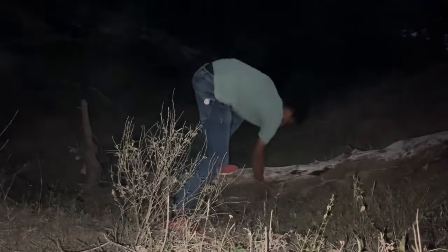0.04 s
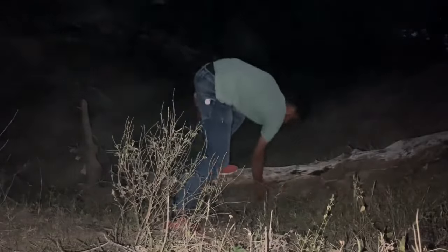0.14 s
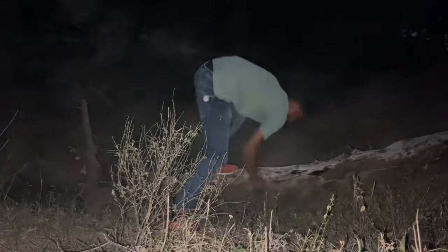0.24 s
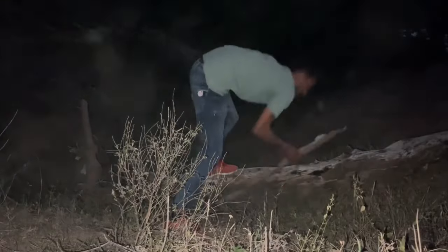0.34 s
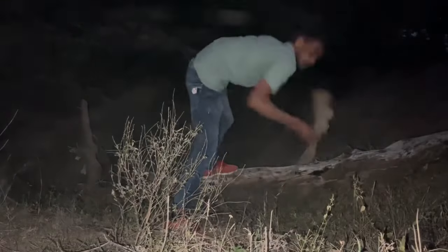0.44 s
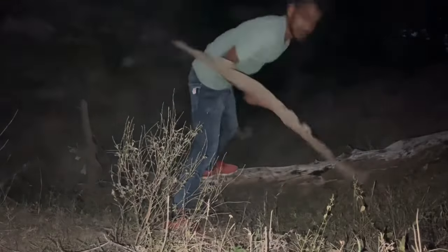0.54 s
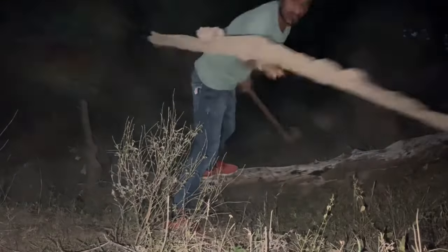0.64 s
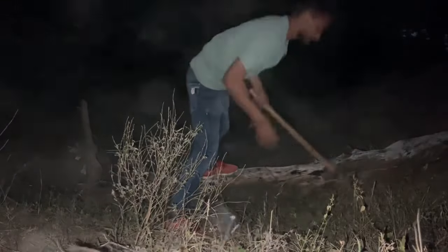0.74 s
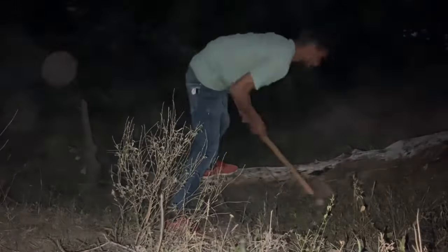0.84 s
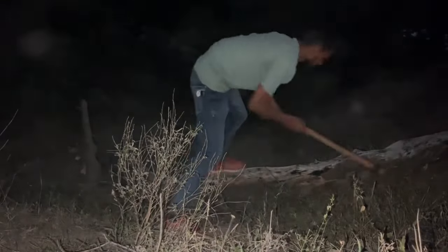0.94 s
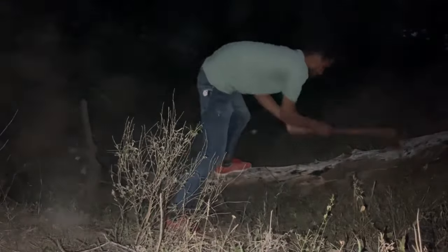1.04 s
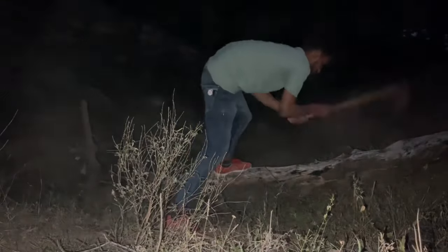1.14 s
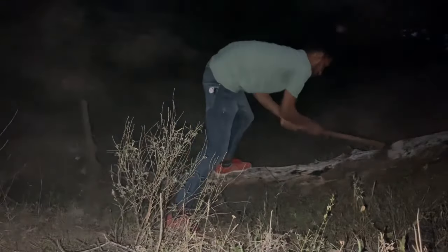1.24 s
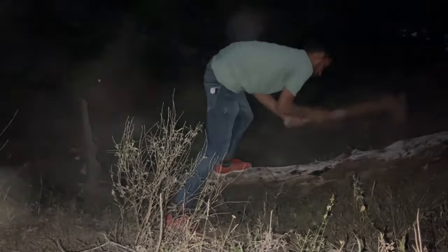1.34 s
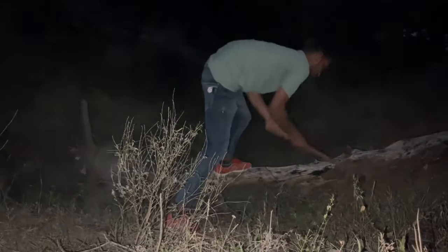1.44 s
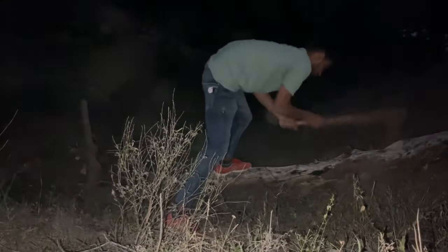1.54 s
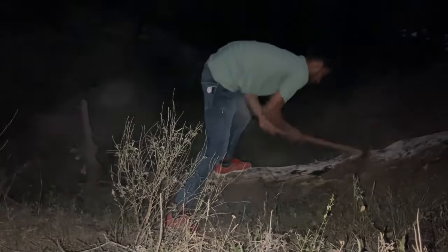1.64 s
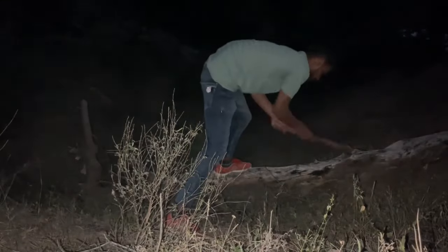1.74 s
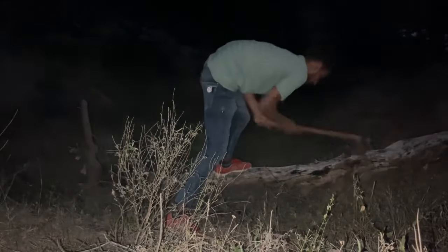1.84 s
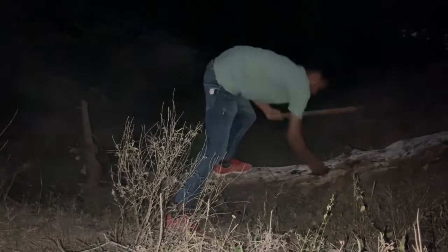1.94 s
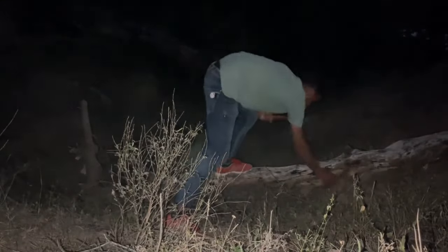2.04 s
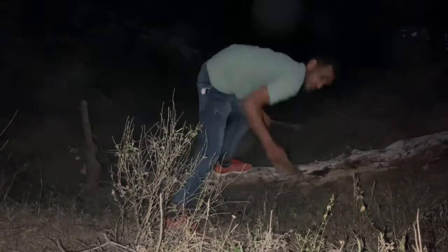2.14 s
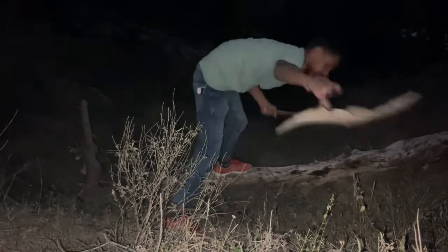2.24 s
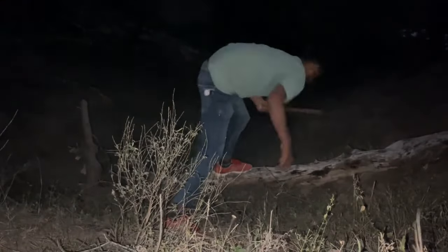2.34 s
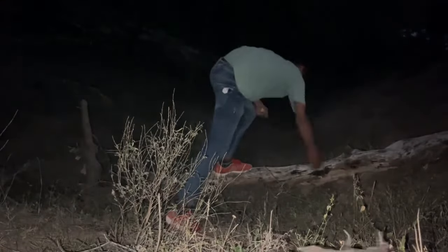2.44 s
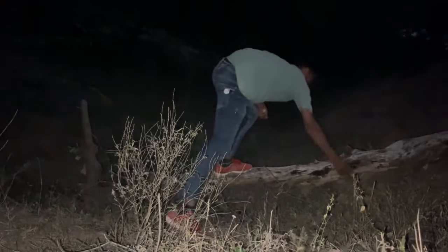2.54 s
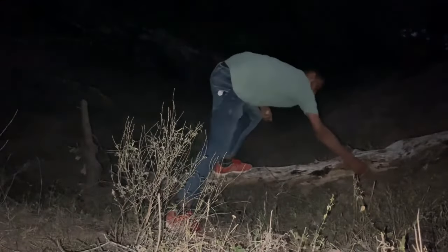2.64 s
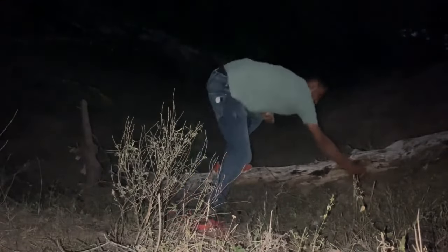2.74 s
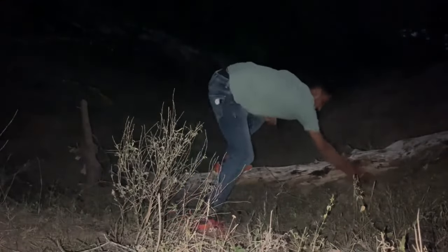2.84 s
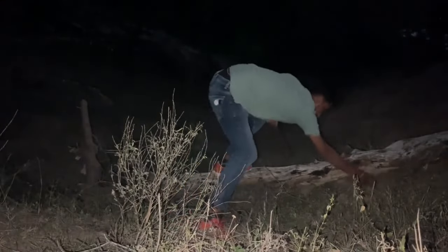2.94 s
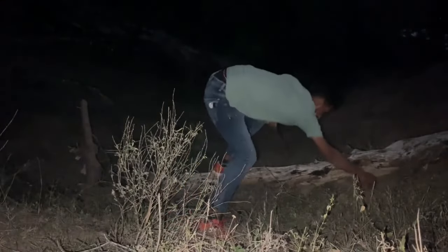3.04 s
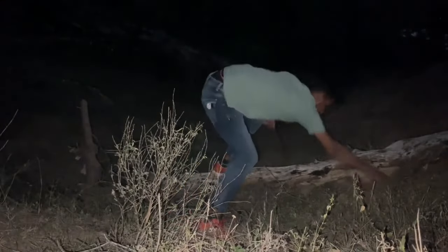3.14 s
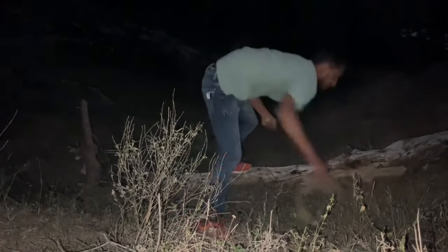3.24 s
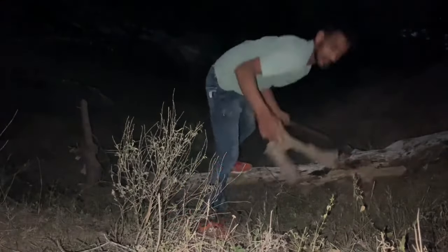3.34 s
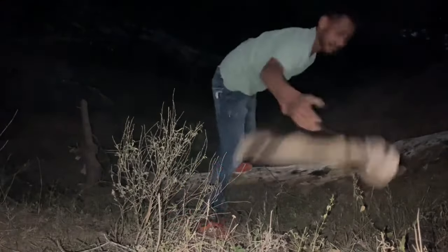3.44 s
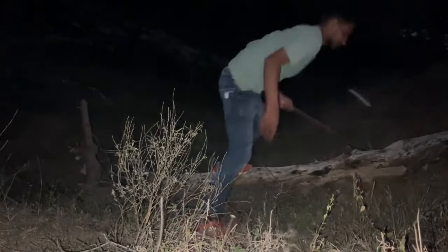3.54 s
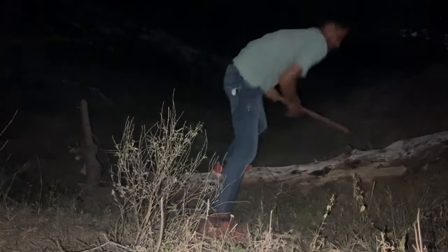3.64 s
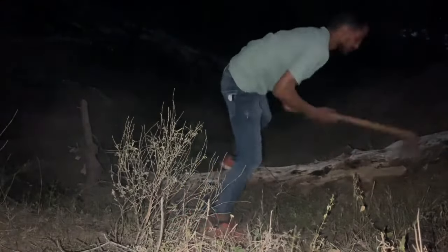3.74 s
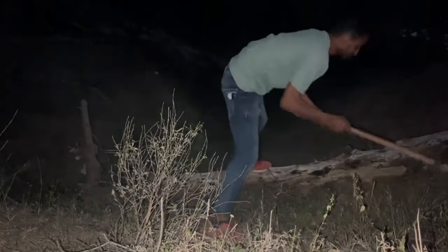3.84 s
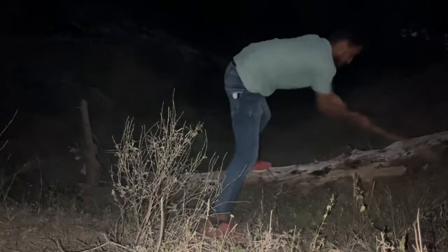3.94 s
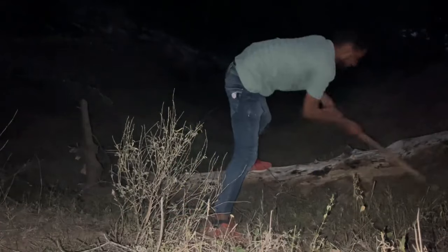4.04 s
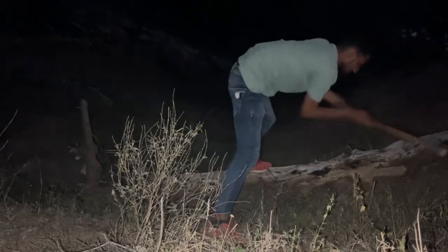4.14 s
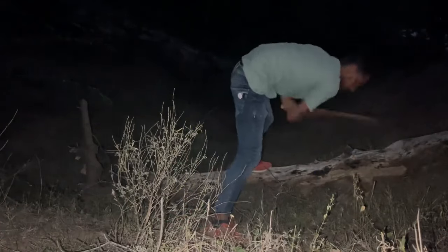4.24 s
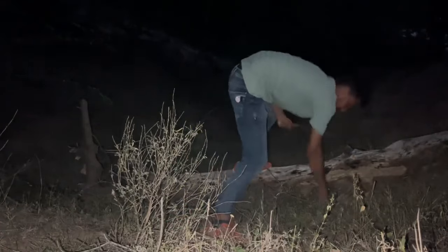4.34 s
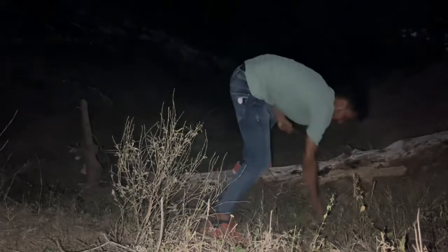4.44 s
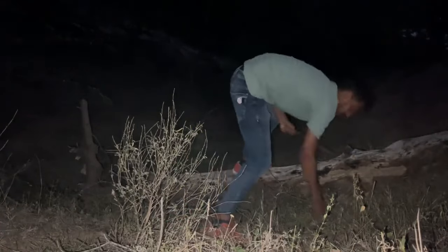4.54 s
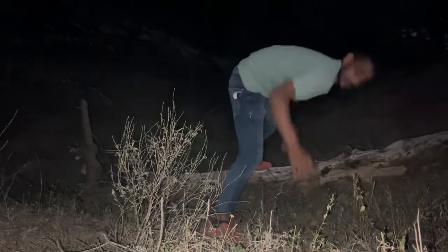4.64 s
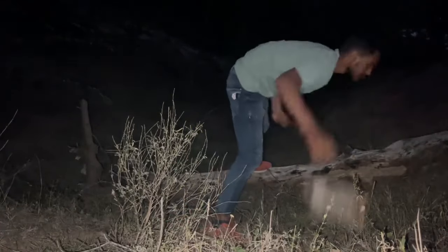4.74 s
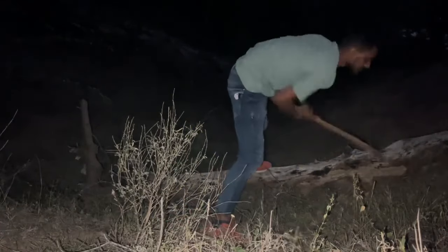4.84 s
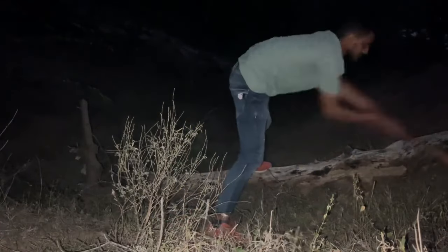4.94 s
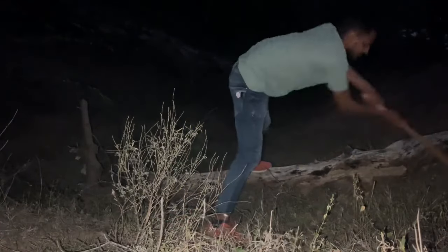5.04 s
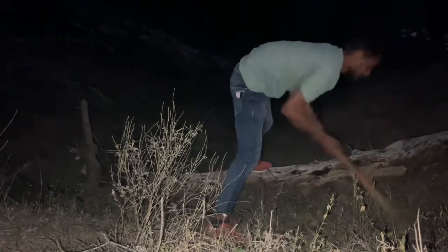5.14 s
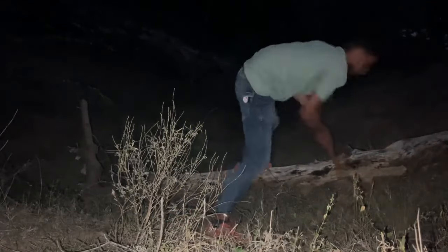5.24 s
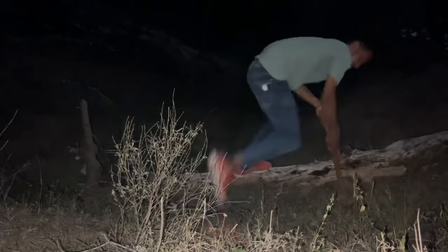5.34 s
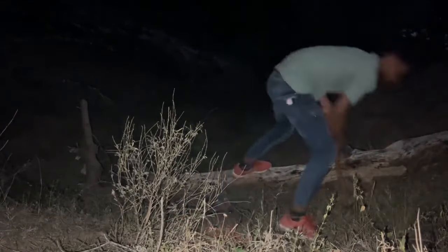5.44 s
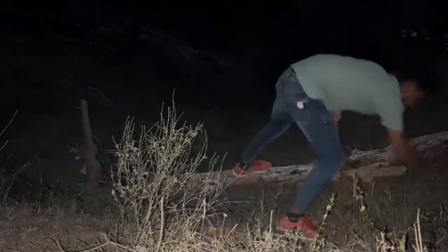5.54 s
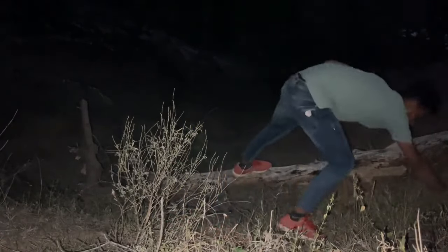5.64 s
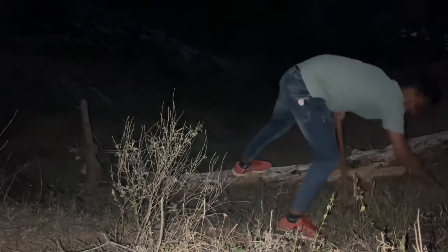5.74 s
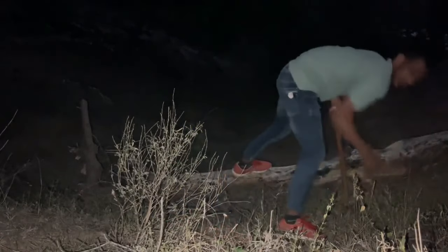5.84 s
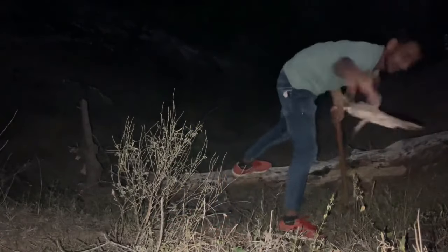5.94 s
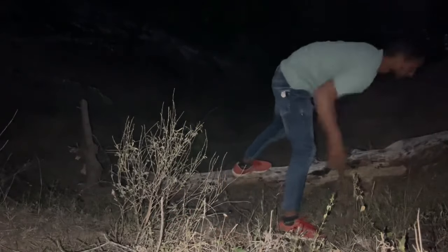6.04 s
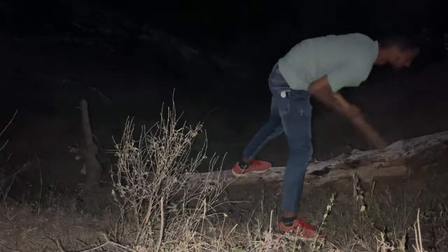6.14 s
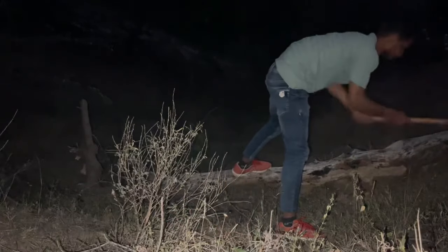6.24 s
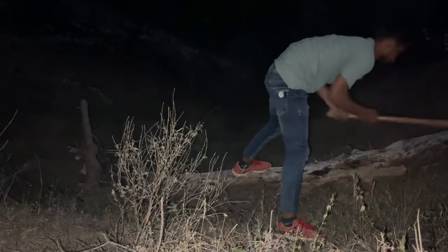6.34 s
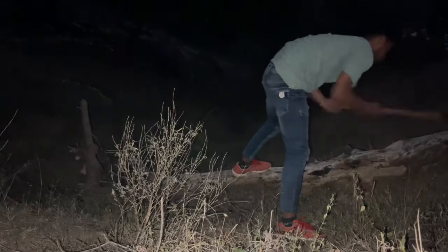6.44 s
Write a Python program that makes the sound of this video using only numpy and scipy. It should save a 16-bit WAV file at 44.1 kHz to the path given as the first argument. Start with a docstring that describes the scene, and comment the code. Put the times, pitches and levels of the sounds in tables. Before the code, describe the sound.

A dry, hollow log is chopped and torn apart in open night air, heard fairly close and slightly right, with hardly any reverberation. From 0.1 to 0.6 s, small twigs click over light scraping and rustling. A brittle crack at 0.8 s scatters crumbs into grass; from 1.1 to 1.8 s come rapid strong breaks, crackling splinters with short hollow knocks, loudest around 1.3 to 1.45. A lighter snap at 2.4 s brings a bright click, then scraping and tiny squeaks. Clustered cracks arrive at 3.05 and 3.2 s, a sharp snap at 3.55, a faint steel ring near 3.7, and a heavy double crack-knock at 4.0. Further breaks fall at 4.8 and 5.05 s, the latter with a clattery chip burst. Quiet rustling leads to a crack at 6.1 and a solid woody knock at 6.3. A low soft rush and hum continue throughout, with very faint high cricket chirps until about 2.7 s.

```python
"""A dry, hollow log is chopped and torn apart with an axe, outdoors on a still night.
Each bite or break is a run of fractures: crackling fibres and splinters, a falling knock, noisy slab, log modes.
Twigs click as short resonant noise, wood squeaks as swelling narrow noise, and the steel head rings in damped modes.
Loose wood and crumbs scrape and patter into dry grass as clouds of tiny rings over friction noise.
Beneath lie a low rush of filtered noise with a faint hum and, early on, thin chirps of a far-off bush cricket."""
import sys
import numpy as np
from scipy import signal
from scipy.fft import rfft, irfft, next_fast_len
from scipy.io import wavfile
from scipy.ndimage import uniform_filter1d, map_coordinates

SR = 44100
rng = np.random.default_rng(int(sys.argv[2]) if len(sys.argv) > 2 else 0)


def unload_audio(sound):
    """Save the sound as a 16-bit wav file, at the path given as the first command line argument."""
    columns = np.transpose(np.atleast_2d(sound))
    # keep every value between -1 and 1, then stretch to whole-number steps
    steps = np.round(np.clip(columns, -1, 1) * 32767)
    wavfile.write(sys.argv[1], SR, steps.astype(np.int16))


N = 285768

# Levels of single sources are set before the stereo placing, bass cut and port colour.
# Bites of the axe and breaks by hand: start_s, tear_s, snap_db, snap_t60_s, bright_db_per_octave (above 5 kHz),
# splinter_db, splinter_hz, knock_db, knock_hz (the pitch falls through it), slab_db, boom_db
BLOWS = [(0.7811, 0.0026, -33.5, .03, -1, -41, 2160, -40, 620, -53, -42.5),
         (1.018, 0.0017, -59.5, .007, 1, -46.5, 2280, -45.5, 765, -51.5, -45.5),
         (1.116, 0, -40.5, .0097, 1, -47, 2280, -34.5, 738, -35.5, -32),
         (1.272, 0, -28, .016, -4, -24, 1510, -27.5, 788, -31, -27.5),
         (1.4255, 0.0023, -24.5, .035, -1.5, -24, 1520, -23, 881, -30.5, -29.5),
         (1.6271, 0.0038, -27.5, .04, -2.5, -35, 2000, -43, 1000, -32.5, -39),
         (1.799, 0.003, -24.5, .034, -5, -32, 2080, -40.5, 978, -34.5, -48),
         (2.3608, 0.0077, -31.5, .025, 1, -36.5, 2400, -42.5, 580, -43, -43),
         (2.46, 0.0018, -45.5, .019, -4, -45.5, 2130, -49, 1100, -63, -67),
         (3.0457, 0.00078, -34.5, .0069, -4, -42.5, 1460, -42, 1153, -44, -51),
         (3.052, 0, -39.5, 0.0062, -6, -42, 1650, -60, 1320, -57, -53),
         (3.0579, 0.00081, -34.5, 0.011, 2, -42, 2000, -48, 1170, -58, -59),
         (3.1736, 0.0027, -35, 0.037, 1, -35.5, 1500, -40, 1230, -40.5, -50),
         (3.1867, 0.00056, -31, .014, -8, -35, 1610, -39, 1244, -50.5, -47),
         (3.1933, 0, -32.5, 0.019, -4.5, -38, 1860, -30.5, 1186, -34.5, -47),
         (3.5392, 0.0011, -24.5, .022, -3, -30.5, 3080, -41.5, 855, -48.5, -40.5),
         (3.7098, 0.001, -42.5, .025, -1, -48.5, 2280, -56, 770, -59, -54),
         (3.8243, 0.0019, -57, 0.0071, -4, -48, 2700, -48, 713, -52.5, -49),
         (4.0146, 0.0042, -29, .02, 0, -28, 2600, -28.5, 986, -29, -36.5),
         (4.0216, 0.00081, -29, .013, -9.5, -35, 1900, -25, 730, -23.5, -34),
         (4.8236, .003, -38.5, .02, -2, -52, 2200, -38.5, 1125, -63, -60),
         (4.8295, 0, -37.5, .01, -2, -32.5, 2490, -54, 1005, -43, -43.5),
         (5.045, 0.0029, -27, 0.041, 3, -29.5, 2160, -27.5, 944, -33.5, -38.5),
         (5.4623, 0.003, -49.5, 0.025, -5, -39, 2330, -45.5, 1270, -57.5, -66),
         (6.0751, 0.0004, -34, .02, -4.5, -36.5, 2320, -44, 724, -44, -44.5),
         (6.3053, 0.00076, -40.5, .014, 4, -26.5, 2030, -19, 810, -28, -38),
         (6.3137, 0.0025, -42.5, 0.035, -2, -39.5, 1750, -28.5, 535, -37, -48)]
# Twigs and falling chips: start_s, peak_db, pitch_hz
TWIGS = [(0.156, -39, 1810), (.194, -39.5, 1450), (.242, -35.5, 2260), (.265, -33.5, 2380),
         (.301, -56, 4030), (.549, -52, 740), (0.563, -52.5, 1370), (.689, -50.5, 4600),
         (0.819, -40.5, 2120), (0.844, -45.5, 2010), (0.867, -38, 4060), (1.33, -42, 6900),
         (1.834, -39, 5070), (2.162, -45.5, 6000), (2.228, -52.5, 7950), (2.416, -29.5, 7850),
         (2.443, -41, 3000), (2.757, -39.5, 2740), (2.957, -42.5, 6300), (3.037, -35, 5900),
         (3.335, -43, 1700), (3.449, -42, 2310), (3.5568, -26, 6040), (3.659, -42, 3520),
         (4.111, -44.5, 1270), (4.777, -45, 12000), (5.14, -46.5, 2000), (5.323, -51, 3500),
         (5.835, -42, 2200), (6.361, -53, 2170), (6.395, -48.5, 8860)]
# Rings of the axe head: start_s, level_db
PINGS = [(1.429, -51), (3.452, -56), (3.709, -42.5)]
# Wood rubbing and squeaking on wood: start_s, level_db, length_s, pitch_hz
SQUEAKS = [(0.542, -55.5, 0.035, 720), (2.614, -59, 0.04, 4040), (2.72, -62.5, 0.028, 3520),
           (2.756, -59, 0.031, 2700), (3.696, -56, 0.0095, 3600)]
# Crumbs showering down after a blow: start_s, t60_s, chips_db, crumbs_db
SHOWERS = [(0.783, 0.31, -47.5, -44.5), (1.275, 0.075, -52, -62), (1.43, 0.42, -67, -59),
           (1.629, 0.18, -48, -46), (1.803, 0.23, -46.5, -45), (2.462, 0.087, -50.5, -68),
           (3.537, 0.22, -42.5, -44), (4.03, 0.21, -67.5, -62), (4.826, 0.4, -58, -57),
           (5.047, 0.05, -21, -57.5), (5.466, .2, -66, -64.5), (6.074, .2, -66, -68),
           (6.308, 0.21, -64, -74)]
# Wood dragged over wood and through dry grass: start_s, length_s, chips_db, crumbs_db
DRAGS = [(0.108, 0.07, -70.5, -62.5), (0.162, 0.19, -56, -54.5), (0.331, .09, -65, -61.5),
         (0.4, 0.12, -82, -67.5), (0.503, 0.11, -80, -67.5), (.757, 0.037, -52, -48),
         (0.838, .08, -68, -57.5), (1.024, 0.042, -68, -71), (1.309, 0.027, -65.5, -68),
         (2.146, 0.063, -67.5, -69), (2.348, 0.14, -57.5, -56), (2.476, 0.15, -80, -66),
         (2.603, 0.054, -68, -65.5), (2.713, 0.092, -60.5, -67.5), (2.84, 0.11, -77, -65.5),
         (2.933, 0.19, -64, -63.5), (3.018, 0.065, -55, -59), (3.082, 0.085, -73, -71.5),
         (3.196, 0.072, -57, -55.5), (3.441, 0.018, -63, -68), (3.63, 0.11, -66, -73),
         (4.06, 0.089, -72, -67.5), (4.761, 0.016, -69.5, -69), (4.854, .09, -68, -60.5),
         (5.104, .05, -63, -65.5), (5.155, 0.12, -84, -74), (5.307, 0.032, -61.5, -59.5),
         (5.484, .06, -64, -74), (5.66, 0.26, -70.5, -66), (6.089, .07, -70, -65.5)]
# Modes of the hollow log, before detuning and scatter: pitch_hz, level_db, t60_s
LOG_MODES = [(245, -13.5, 0.017), (290, 2, 0.08), (360, -3.5, 0.087), (458, -0.5, 0.0067), (561, -4, 0.063),
             (756, -4, 0.054)]
# Modes of the steel axe head, before scatter: pitch_hz, level_db, t60_s
STEEL_MODES = [(2560, -17, 0.054), (6200, -2.5, .03), (7900, -13, 0.034), (12800, -16.5, .025),
               (14490, -16, .028)]
# Spectrum of snapping fibres: frequency_hz, relative_level_db
SNAP_SPECTRUM = [(1500, -42.5), (3000, -9.5), (4000, -1), (6000, -2), (9000, -2), (12000, -7.5),
                 (15000, -6), (17000, -16)]
# Spectrum of splinters: frequency_hz, relative_level_db
SPLINTER_SPECTRUM = [(200, -32.5), (700, 12.5), (1100, -0.5), (1500, 8.5), (2200, 0), (3400, 2.5),
                     (4500, -4), (9000, -48)]
# Spectrum of the loosened slab: frequency_hz, relative_level_db
SLAB_SPECTRUM = [(60, -30), (200, -19), (350, 4.5), (470, 8.5), (600, -1), (800, 7), (1100, 1), (1400, 4.5),
                 (1800, -28), (4000, -50)]
# Spectrum of scraping chips: frequency_hz, relative_level_db
SCRAPE_SPECTRUM = [(200, -25), (650, 1), (1300, -2.5), (2300, -2.5), (3400, 1.5), (4400, 0.5), (6000, -8.5),
                   (12000, -34.5)]
# Spectrum of crumbs rustling in the grass: frequency_hz, relative_level_db
RUSTLE_SPECTRUM = [(2000, -32.5), (4000, -15.5), (5500, -6), (10000, -1), (13000, -2.5), (15500, -3),
                   (16500, -12)]
# Spectrum of the night air: frequency_hz, relative_level_db
AIR_SPECTRUM = [(25, -44), (55, -34.5), (80, -31.5), (115, -17), (150, -13.5), (200, -8.5), (280, -0.5),
                (400, -7.5), (600, -10), (850, -20.5), (1300, -29.5), (2000, -41), (4000, -50.5),
                (15000, -65.5)]
# Slow level of the night air, before a 1 dB lift: time_s, level_db
AIR_LEVEL = [(0, -57.5), (2.2, -57), (3.1, -55.6), (4.7, -55.5), (6.48, -55.5)]
# Level balance of the two microphone ports: frequency_hz, left_minus_right_db
PORT_BALANCE = [(100, -.5), (700, -1.5), (2500, -3), (5000, -2.3), (8000, .3), (11000, 5), (15000, 7.5)]
# Phase between the two microphone ports: frequency_hz, left_lead_rad
PORT_PHASE = [(100, 0), (700, -.25), (2200, -.6), (6000, -.6), (9500, -.2), (12000, .8), (15000, .7)]

BLOW_SPAN_S = .005  # a burst at 0 dB has the energy of rms 1 held this long
FIRST_CRACK, FIRST_CRACK_T60_S = 1.2, 0.0062  # gain of the first fracture over the tearing, and its decay
SOFT_ONSET_S, SOFT_ONSET_DB = .004, -23  # a faint swell begins this long before a break, this far under its snap
KNOCK_T60_S = .018
LOG_DETUNE_OCT = .07  # typical shift: the log rings a little differently at each spot
SHAPE_DB, SHAPE_KNOTS = 2.6, 5  # depth of a piece's own resonances, and how many knots to the octave
SHOWER_RISE_S = 0.0073  # the first crumbs land
DRAG_RISE, DRAG_HOLD = 0.2, 0.67  # shares of a drag's length
DRAG_T60_S = .14  # the litter settles
STIR_DB = -88  # chips and crumbs that keep stirring underfoot
CHIRPS_FROM_S, CHIRPS_UNTIL_S, CHIRP_EVERY_S, CHIRP_S = 0.48, 2.72, 0.3, .12
CRICKET_HZ, CRICKET_DB = 10300, -85
TOP_HZ = 16200  # middle of the recorder's upper roll-off


def amp(db):
    """Decibels to gain."""
    return 10 ** (np.asarray(db) / 20)


def unit(x):
    """Scale to rms 1."""
    return x / np.sqrt(np.mean(x ** 2) + 1e-20)


def burst(x):
    """Scale a short sound to the energy of rms 1 held for BLOW_SPAN_S."""
    return unit(x) * np.sqrt(BLOW_SPAN_S * SR / x.shape[-1])


def along(points, hz):
    """Read a curve of (Hz, value) points on a log frequency axis."""
    point_hz, values = np.transpose(points)
    return np.interp(np.log(hz + 1), np.log(point_hz + 1), values)


def filtered(x, response):
    """Shape x with a response given as a function of frequency."""
    n = x.shape[-1]
    padded = next_fast_len(n + 4096)
    hz = np.fft.rfftfreq(padded, 1 / SR)
    return irfft(rfft(x, padded) * response(hz), padded)[..., :n]


def coloured(x, spectrum):
    """Colour x with a spectrum of (Hz, dB) points, at rms 1."""
    return unit(filtered(x, lambda hz: amp(along(spectrum, hz))))


def band(hz, centre_hz, octaves):
    """Gain of a resonance that falls to half this many octaves to each side."""
    return 1 / (1 + (np.log2((hz + 1) / centre_hz) / octaves) ** 2)


def fade(t, attack, t60, hold=0):
    """A smooth rise, a hold and an exponential decay."""
    return (1 - np.exp(-(t / attack) ** 2)) * amp(-60 * np.maximum(t - hold, 0) / t60)


def swell(t, length):
    """A half-sine rise and fall over the length."""
    return np.sin(np.pi * np.minimum(t / length, 1))


def ring(modes, t, attack, scatter_db):
    """Damped modes, struck at new strengths each time."""
    sound = np.zeros(len(t))
    for hz, db, t60 in modes:
        strength = amp(db + scatter_db * rng.normal())
        sound += strength * fade(t, attack, t60) * np.sin(2 * np.pi * hz * t)
    return sound


def add(track, s, sound):
    """Mix a sound into a track at time s."""
    part = track[..., max(round(s * SR), 0):][..., :sound.shape[-1]]
    part += sound[..., :part.shape[-1]]


def spread(pair, side_db):
    """Turn two unrelated signals into a common sound and a part that differs between the ports."""
    mid, side = pair
    return np.array([mid + amp(side_db) * side, mid - amp(side_db) * side])


def crackle(size, rate, spread_db, bed):
    """Tiny breaks of uneven strength, rate a second, over a bed of fine friction."""
    shape = (2, size)
    sizes = rng.standard_normal(shape) * amp(spread_db * np.minimum(rng.exponential(size=shape), 3))
    breaks = (rng.random(shape) < rate / SR) * sizes
    return spread(unit(breaks) + bed * rng.standard_normal(shape), side_db=-14)


def grains(count, centre_hz, octaves, cycles, spread_db):
    """Countless crumbs, each a brief ring at its own pitch and from its own direction."""
    when, pitch, size, place = rng.random((count, 4)).T[:, :, None]
    k = np.arange(int(5 * cycles * SR / centre_hz))
    turns = centre_hz * 2 ** (octaves * (2 * pitch - 1)) * k / SR
    strength = amp(spread_db * np.minimum(-np.log(size), 4))
    rings = strength * np.sin(2 * np.pi * turns) * np.exp(-turns / cycles)
    index = ((when * N).astype(int) + k).ravel()
    sides = []
    for sign in (1, -1):
        pan = 1 + sign * 0.58 * (2 * place - 1)
        sides.append(np.bincount(index, (rings * pan).ravel(), N)[:N])
    return unit(np.array(sides))


def own_shape(x):
    """Each piece of wood has its own uneven resonances."""
    knots = rng.standard_normal(80)
    return filtered(x, lambda hz: amp(SHAPE_DB * map_coordinates(knots, [SHAPE_KNOTS * np.log2(hz + 1)])))


def night_air():
    """A dull, far-off rush, nearly the same at both ports, with a faint low hum of narrow noise."""
    times, levels = np.transpose(AIR_LEVEL)
    level_db = np.interp(np.arange(N) / SR, times, levels)
    rush = spread(coloured(rng.standard_normal((2, N)), AIR_SPECTRUM), side_db=-14.5)
    hum = unit(filtered(rng.standard_normal(N), lambda hz: 1 / (1 + ((hz - 114) / 6) ** 2)))
    lean = amp([[-.8], [.8]])  # left, right
    return amp(level_db + 1) * (rush + amp(-20.5) * hum) * lean


def bush_cricket():
    """Faint, thin chirps of narrow noise at an even pace."""
    out, t = np.zeros(N), np.arange(SR // 5) / SR
    for s in np.arange(CHIRPS_FROM_S, CHIRPS_UNTIL_S, CHIRP_EVERY_S):
        rasp = unit(filtered(rng.standard_normal(len(t)), lambda hz: band(hz, CRICKET_HZ, octaves=.035)))
        add(out, s, amp(CRICKET_DB) * rasp * swell(t, CHIRP_S))
    return out


def litter_flow():
    """Strength of chips and crumbs: showers start fast and die away, drags build, hold and settle."""
    power, t = np.zeros((2, N)), np.arange(SR // 2) / SR
    for s, t60, chips_db, crumbs_db in SHOWERS:
        shower = fade(t, SHOWER_RISE_S, t60)
        add(power, s, (amp([[chips_db], [crumbs_db]]) * shower) ** 2)
    for s, length, chips_db, crumbs_db in DRAGS:
        drag = fade(t, DRAG_RISE * length, DRAG_T60_S, hold=DRAG_HOLD * length)
        add(power, s, (amp([[chips_db], [crumbs_db]]) * drag) ** 2)
    # unrelated noises add by power
    return np.sqrt(power + amp(STIR_DB) ** 2)


def drift(size):
    """Slow random wander at rms 1, smoothed over this many samples."""
    return unit(uniform_filter1d(rng.standard_normal(N), size=size))


def litter():
    """Loose wood scrapes and crumbs shower into the grass as clumped tiny rings over friction."""
    chip_flow, crumb_flow = litter_flow()
    friction = spread(rng.standard_normal((2, N)), side_db=-13.0)
    stalks = grains(count=3000, centre_hz=4200, octaves=1.6, cycles=7, spread_db=3)
    chips = grains(count=14000, centre_hz=2400, octaves=1.4, cycles=1.6, spread_db=3.6)
    chips = chips + .6 * stalks + .65 * friction
    crumbs = grains(count=30000, centre_hz=8500, octaves=1, cycles=3, spread_db=3.4)
    crumbs = crumbs + .8 * stalks + .4 * friction
    # big chips and fine crumbs fall together, but each also in clumps of its own
    clumps_db = 3.2 * drift(size=300)
    scrape = coloured(chips * amp(clumps_db + 1.5 * drift(size=450)), SCRAPE_SPECTRUM)
    rustle = coloured(crumbs * amp(clumps_db + 3.5 * drift(size=600)), RUSTLE_SPECTRUM)
    return chip_flow * scrape + crumb_flow * rustle


def squeaks():
    """Dry faces stick and slip, swelling a narrow resonance."""
    out, t = np.zeros(N), np.arange(SR // 10) / SR
    for s, db, length, pitch_hz in SQUEAKS:
        tone = unit(filtered(rng.standard_normal(len(t)), lambda hz: band(hz, pitch_hz, octaves=0.13)))
        add(out, s, amp(db) * tone * swell(t, length))
    return out


def twigs():
    """Thin sticks click and ring briefly around their own pitch."""
    out, t = np.zeros((2, N)), np.arange(SR // 20) / SR
    for s, db, pitch_hz in TWIGS:
        noise = spread(rng.standard_normal((2, len(t))), side_db=-17)
        click = filtered(noise, lambda hz: band(hz, pitch_hz, octaves=0.55)) * fade(t, 0.00038, 0.012)
        add(out, s, amp(db) * click / np.abs(click).max())
    return out


def axe_head():
    """The steel rings in damped modes when it comes free of the wood."""
    out, t = np.zeros(N), np.arange(SR // 8) / SR
    for s, db in PINGS:
        add(out, s, amp(db) * burst(ring(STEEL_MODES, t, attack=.0005, scatter_db=1)))
    return out


def snapping_fibres(t, tear_s, t60, bright_db):
    """Fibres give way in a dense volley; the first fracture stands out of the tearing."""
    tearing = fade(t, .00055, t60, hold=tear_s) + FIRST_CRACK * fade(t, .00035, FIRST_CRACK_T60_S)
    fibres = coloured(crackle(len(t), rate=6400, spread_db=3.0, bed=1.0), SNAP_SPECTRUM)
    fibres = filtered(fibres, lambda hz: amp(bright_db * np.log2(np.maximum(hz, 5000) / 5000)))
    return burst(own_shape(fibres) * tearing)


def splinters(t, tear_s, t60, pitch_hz):
    """Each splinter crackles around a pitch set by its size."""
    cracks = coloured(crackle(len(t), rate=2500, spread_db=1.5, bed=.9), SPLINTER_SPECTRUM)
    pitched = filtered(own_shape(cracks), lambda hz: band(hz, pitch_hz, 0.19) + 0.25)
    return burst(pitched * fade(t, 0.000077, t60 * 1.3, hold=tear_s))


def soft_onset(t):
    """A faint swell of crackling noise around the start of each break, softening its attack."""
    noise = crackle(len(t), rate=3000, spread_db=3.5, bed=.5) * swell(t, 2 * SOFT_ONSET_S)
    return burst(coloured(noise, SNAP_SPECTRUM))


def knock(t, knock_hz):
    """Stiff wood carries the high bending waves fastest, so the knock falls in pitch."""
    pitch_hz = knock_hz * (0.713 + 0.76 * np.exp(-t / 0.003))
    tone = np.sin(2 * np.pi * np.cumsum(pitch_hz) / SR)
    return burst(tone * fade(t, 0.0022, KNOCK_T60_S))


def log_boom(t):
    """The hollow log rings in its damped modes, detuned together."""
    stretched = t * 2 ** (LOG_DETUNE_OCT * rng.normal())
    return burst(ring(LOG_MODES, stretched, attack=.002, scatter_db=3))


def chopping():
    """Fibres and splinters tear; when the tear is through, the slab swings up and shakes the log."""
    out, t = np.zeros((2, N)), np.arange(SR // 8) / SR
    for (s, tear_s, snap_db, t60, bright_db, splinter_db, splinter_hz,
         knock_db, knock_hz, slab_db, boom_db) in BLOWS:
        add(out, s - SOFT_ONSET_S, amp(snap_db + SOFT_ONSET_DB) * soft_onset(t))
        add(out, s, amp(snap_db) * snapping_fibres(t, tear_s, t60, bright_db))
        add(out, s, amp(splinter_db) * splinters(t, tear_s, t60, splinter_hz))
        through_s = s + tear_s
        slab = burst(coloured(rng.standard_normal(len(t)), SLAB_SPECTRUM) * fade(t, 0.0039, 0.019))
        add(out, through_s, amp(knock_db) * knock(t, knock_hz))
        add(out, through_s, amp(slab_db) * slab)
        add(out, through_s, amp(boom_db) * log_boom(t))
    return out


def bushes(x, wet_db, t60):
    """Open ground and shrubs return only a faint, short tail of decaying noise."""
    t = np.arange(SR // 3) / SR
    tail = rng.standard_normal((2, len(t))) * fade(t, .008, t60)
    tail = tail / np.linalg.norm(tail[0])
    return x + amp(wet_db) * signal.fftconvolve(x, tail, axes=1)[:, :N]


def ports(x):
    """Sound from a little to the right reaches the two ports with their own colour and delay."""
    half = np.array([[.5], [-.5]])  # left, right

    def response(hz):
        return amp(half * along(PORT_BALANCE, hz)) * np.exp(1j * half * along(PORT_PHASE, hz))

    return filtered(x, response)


def scene():
    """The work at the log, a little to the right, heard through the night air."""
    right_db = 0.2
    chops = chopping() * amp([[-right_db], [right_db]])
    wood = chops + twigs() + squeaks() + axe_head() + litter()
    # deep bass is cut from the wood sounds
    wood = signal.sosfilt(signal.butter(1, 170, "high", fs=SR, output="sos"), wood)
    return ports(bushes(wood, wet_db=-25.5, t60=0.094)) + bush_cricket() + night_air()


def record(dry):
    """The recorder rolls the top off to nothing across 600 Hz around TOP_HZ."""
    return filtered(dry, lambda hz: np.clip((TOP_HZ - hz) / 600 + .5, 0, 1))


dry = scene()
out = record(dry)
unload_audio(out)
```